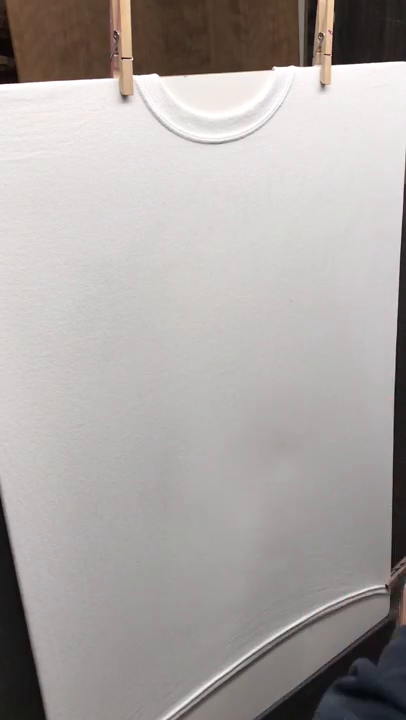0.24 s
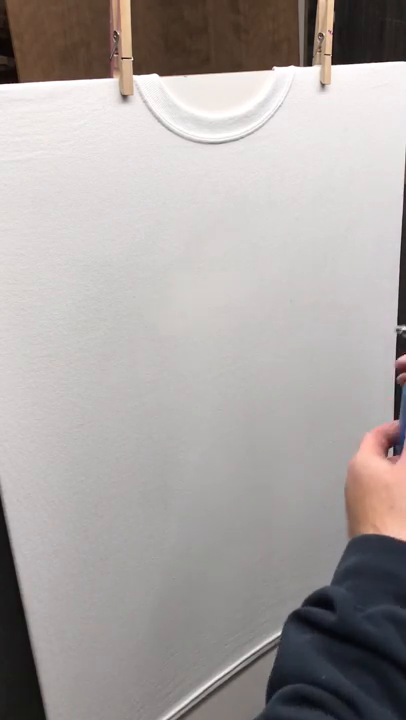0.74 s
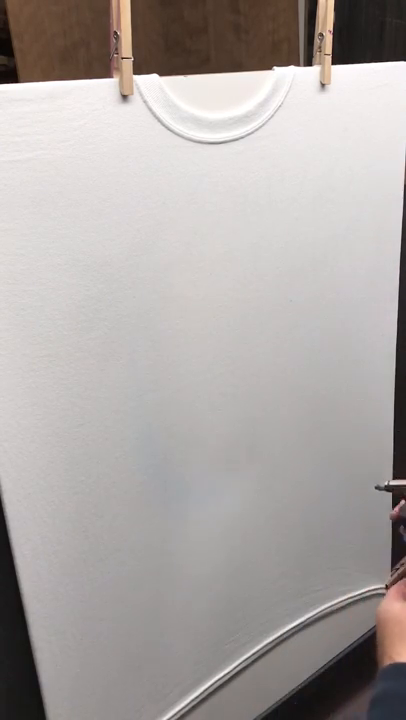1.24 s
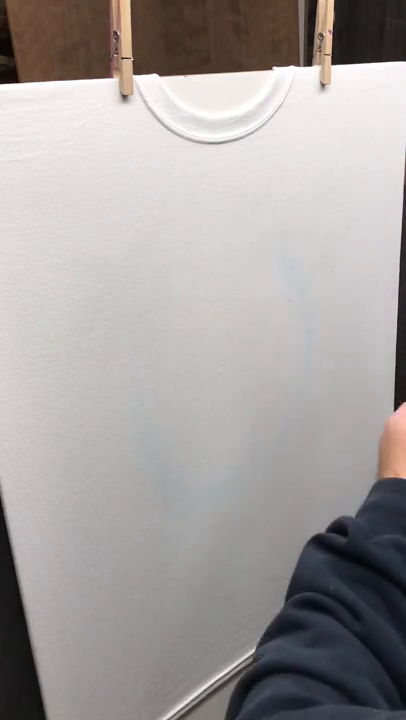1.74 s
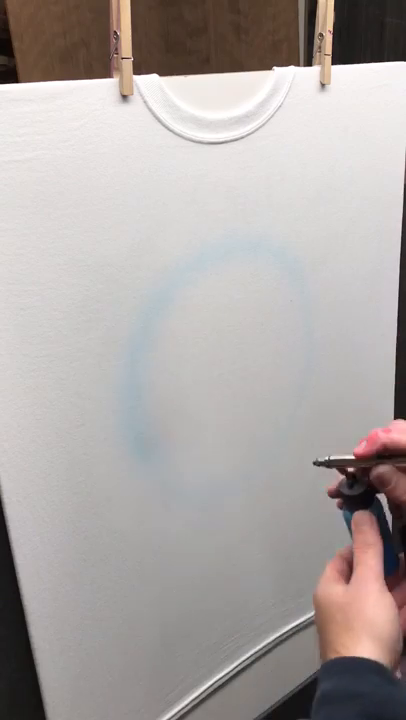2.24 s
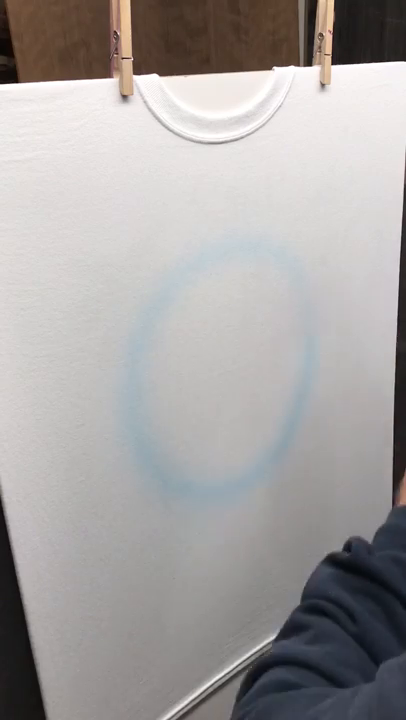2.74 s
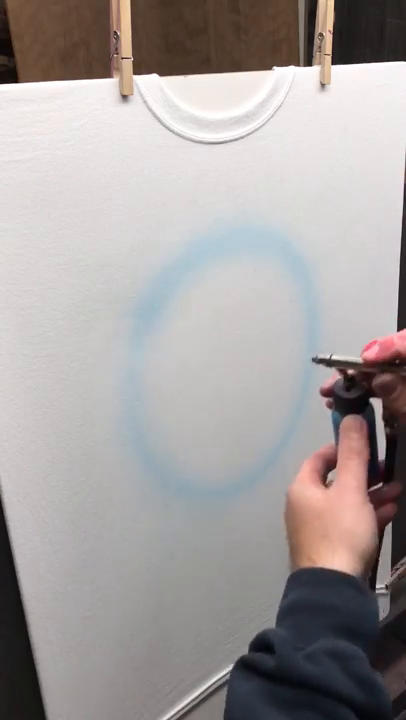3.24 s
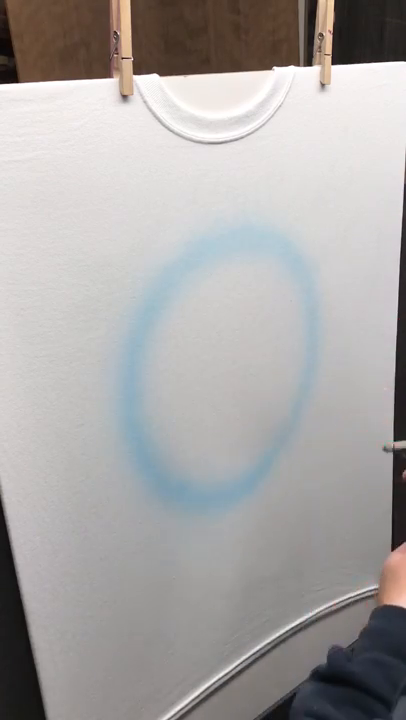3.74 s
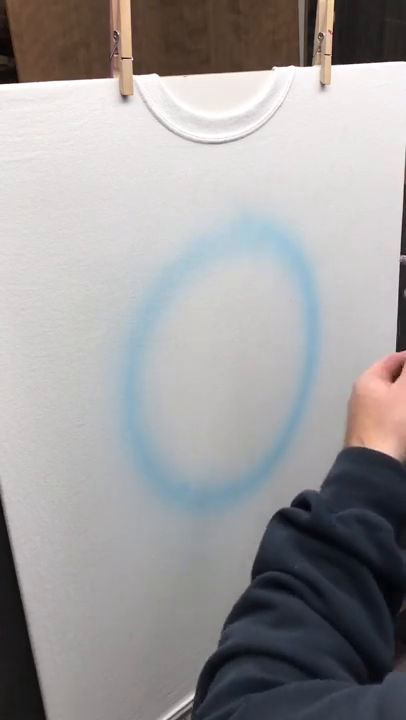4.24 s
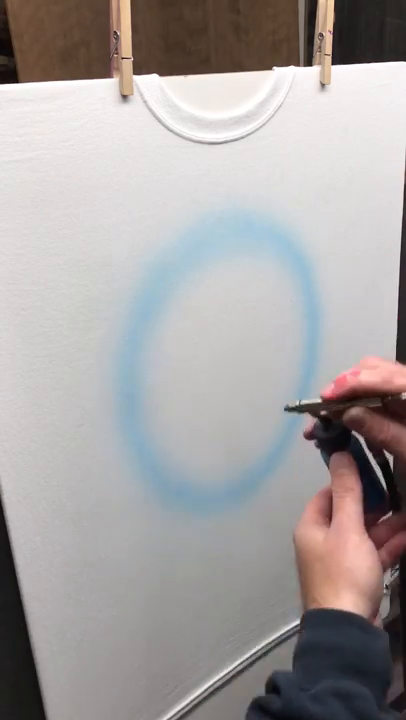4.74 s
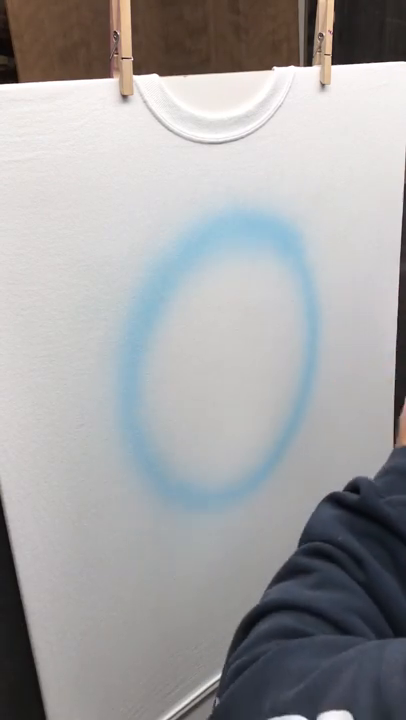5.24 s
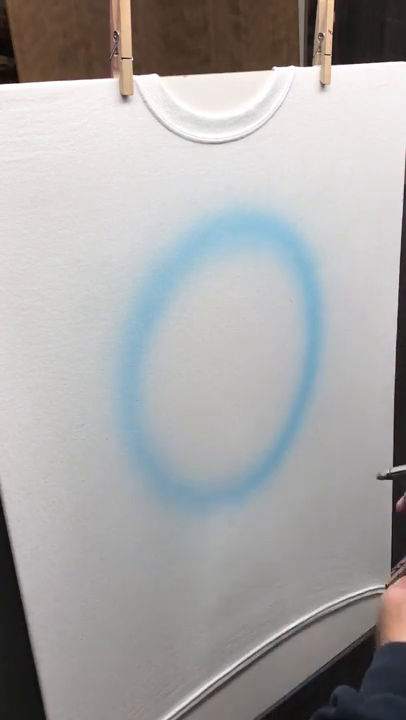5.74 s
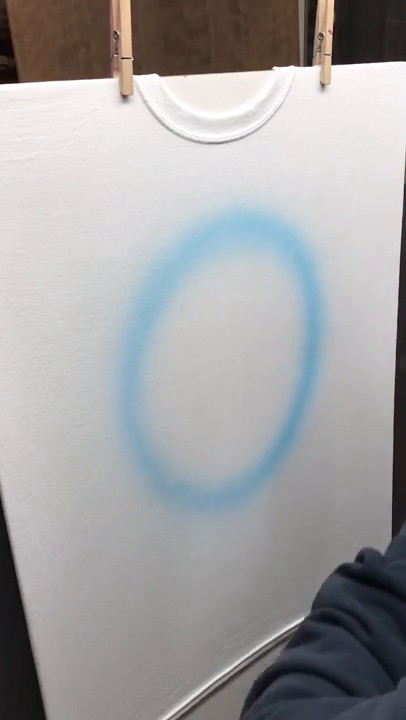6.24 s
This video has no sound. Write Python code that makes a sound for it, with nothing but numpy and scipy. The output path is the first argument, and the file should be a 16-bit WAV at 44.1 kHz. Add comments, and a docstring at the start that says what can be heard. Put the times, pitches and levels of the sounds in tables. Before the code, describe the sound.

Steady high spray hiss rises and falls in slow, uneven waves, its airy tone gliding as a small paint jet circles over fabric indoors.

```python
"""An airbrush hisses as it paints loops on a shirt pinned to a board, in a quiet room.
The nozzle's hiss is shaped noise, louder on each upswing; where the jet strikes the cloth
it adds a softer, lower rush of noise. Short echoes from nearby surfaces comb both sounds,
and the notches glide as the hand circles. Dull puffs, a faint murmur and a hum lie beneath."""
import sys
import numpy as np
from scipy import signal
from scipy.fft import rfft, irfft, next_fast_len
from scipy.io import wavfile
from scipy.ndimage import map_coordinates

SR = 44100
rng = np.random.default_rng(int(sys.argv[2]) if len(sys.argv) > 2 else 0)


def to_wav(s):
    """Save 16-bit WAV."""
    ch = np.atleast_2d(s).T  # columns
    pcm = np.round(np.clip(ch, -1, 1) * 32767)  # PCM
    wavfile.write(sys.argv[1], SR, pcm.astype(np.int16))


N = 285768


def amp(db):
    """Decibels to gain."""
    return 10 ** (np.asarray(db) / 20)


def unit(x):
    """Scale to an rms (average strength) of 1."""
    return x / np.sqrt(np.mean(x ** 2) + 1e-20)


def along(points, hz):
    """Read (frequency, value) points on a logarithmic frequency axis."""
    point_hz, values = np.transpose(points)
    return np.interp(np.log(hz + 1), np.log(point_hz + 1), values)


def curve(points, t):
    """Read (time, value) points at the times t, with straight lines between them."""
    point_s, values = np.transpose(points)
    return np.interp(t, point_s, values)


def wobble(rate):
    """A smooth random curve through `rate` random points a second."""
    points = rng.standard_normal(int(N * rate / SR) + 4)
    return map_coordinates(points, [np.arange(N) * rate / SR])


def filtered(x, response):
    """Filter x with a fixed gain for each frequency: response(Hz)."""
    size = next_fast_len(N + SR // 2)
    spectrum = rfft(x, size) * response(np.fft.rfftfreq(size, 1 / SR))
    return irfft(spectrum, size)[..., :N]


def noise(colour):
    """Random noise of rms 1, with its frequencies weighted by the (Hz, dB) points."""
    white = rng.standard_normal(N)
    return unit(filtered(white, lambda hz: amp(along(colour, hz))))


def swept(x, response):
    """Filter x in short overlapping frames, so the filter can change: response(Hz, s)."""
    frame = 1024  # samples
    hz, t, frames = signal.stft(x, SR, nperseg=frame)
    return signal.istft(frames * response(hz[:, None], t), SR, nperseg=frame)[1][:N]


def delayed(hz, lag_ms):
    """A delay, written as the turn in phase that it gives each frequency."""
    return np.exp(-2j * np.pi * hz * lag_ms / 10 ** 3)


def room(t, drift_db=1.2, hum_hz=176, hum_db=-80):
    """Faint low murmur of noise that drifts in level, with a wavering sine hum in it."""
    # murmur level before the drift: start_s, level_db
    murmur_level = [(0.0, -67.5), (0.35, -70), (1.0, -71), (3.5, -70), (4.55, -68.5), (5.4, -72.5),
                    (6.0, -69), (6.48, -73.5)]
    # colour of the murmur: frequency_hz, density_db (per Hz)
    murmur_colour = [(20, -40), (33, -15), (46, -4), (75, 0.5), (130, 0), (175, -1), (230, -0.5),
                     (400, -3.5), (1000, -16), (4000, -45)]
    level_db = curve(murmur_level, t) + drift_db * wobble(6)
    murmur = amp(level_db) * noise(murmur_colour)
    hum_level = amp(hum_db + 2 * wobble(3.95))
    hum = hum_level * np.sin(2 * np.pi * hum_hz * t + wobble(16))
    return murmur + hum


def bumps(t, rise=0.02, gain_db=-9):
    """Soft low puffs as the brush is swung: noise that swells over `rise` seconds and then dies away."""
    # the puffs: peak_s, level_db (before gain_db)
    puffs = [(0.108, -66), (0.249, -64), (1.218, -58), (2.969, -58), (3.324, -46), (4.578, -65)]
    # colour of the puffs: frequency_hz, density_db (per Hz)
    puff_colour = [(40, -30), (110, -16), (180, -1), (300, -2.5), (450, -2), (1200, -43)]
    envelope = np.zeros(N)
    for peak_s, level_db in puffs:
        age = np.maximum(t - peak_s + rise, 0) / rise  # 1 at the peak
        envelope += amp(level_db + gain_db) * age * np.exp(1 - age)
    return envelope * noise(puff_colour)


def height(t):
    """Height of the hand in its loop; it eases from one turning point to the next."""
    # turning points of the circling hand: time_s, height (0 bottom to 1 top)
    swing = [(0.0, 0.36), (0.2, 0.07), (1.0, 0.68), (1.42, 0.15), (1.92, 0.76), (2.6, 0.19), (3.17, 0.95),
             (3.76, 0.11), (4.47, 0.98), (4.77, 0.24), (5.15, 0.99), (6.14, 0.18), (6.48, 0.77)]
    turn_s, turn_height = np.transpose(swing)
    turns = np.arange(len(turn_s))
    leg, part = np.divmod(np.interp(t, turn_s, turns), 1)
    eased = (1 - np.cos(np.pi * part)) / 2
    return np.interp(leg + eased, turns, turn_height)


def surroundings(hz, t, count=20):
    """Weak later reflections, whose delays shift with the hand and add a fine ripple."""
    strength = 0.055
    earliest_ms, latest_ms, travel_ms = 1.8, 12, 0.33
    hand_ms = travel_ms * height(t)
    reflections = 0
    for u, v in rng.random((count, 2)):
        # squaring crowds the delays early; each may grow or shrink as the hand rises
        lag_ms = earliest_ms + (latest_ms - earliest_ms) * u ** 2 + (2 * v - 1) * hand_ms
        reflections = reflections + delayed(hz, lag_ms)
    return 1 + strength * reflections


def echoes(hz, t):
    """Direct sound plus short echoes; small surfaces reflect little bass and scatter the top."""
    # echoes from nearby surfaces: strength (before the filter below),
    # bottom_lag_ms and top_lag_ms (at the bottom and top of the loop)
    nearby = [(.28, .2, .385), (.24, .195, .09), (.18, .486, .87), (.11, .53, .39), (.08, 2.6, 2.93)]
    lowest_hz, dull_hz = 1300, 11000
    bounces = 0
    for strength, bottom_ms, top_ms in nearby:
        lag_ms = bottom_ms + (top_ms - bottom_ms) * height(t)
        bounces = bounces + strength * delayed(hz, lag_ms)
    bass_cut = hz ** 2 / (hz ** 2 + lowest_hz ** 2)
    treble_cut = 1 / (1 + (hz / dull_hz) ** 2)
    return 1 + bounces * bass_cut * treble_cut


def stroke(t):
    """Rush and body (dB) of the jet on the cloth: each stroke rises, holds and falls back."""
    # strokes in which the jet bears on the cloth: start_s, end_s (middles of the rise and fall),
    # rush_db (level before swing and gain), body_db (lift of the lower rush)
    strokes = [(0.95, 1.46, -55, -9), (1.87, 4.62, -52, 0.5), (4.957, 5.884, -52.5, 0.5),
               (6.245, 6.6, -52, 1.5)]
    attack_s, release_s = 0.17, 0.04
    glancing_db = -66.5  # rush between strokes

    def ramp(age, length):
        return np.clip(0.5 + age / length, 0, 1)

    rush_db, body_db = glancing_db, 0
    for start, end, stroke_rush_db, stroke_body_db in strokes:
        contact = ramp(t - start, attack_s) * ramp(end - t, release_s)
        rush_db = rush_db + (stroke_rush_db - glancing_db) * contact
        body_db = body_db + stroke_body_db * contact
    return rush_db, body_db


def cloth(t, flutter_db=0.8, swing_db=4.5, gain_db=-1.0):
    """The jet spreads over the shirt: a rush, louder at the top of the loop, hollower at the bottom."""
    # colour of the rush: frequency_hz, density_db (per Hz)
    rush_colour = [(100, -35), (250, -15.5), (430, -16.5), (540, -1.5), (850, -1), (1100, 1), (1450, -3),
                   (1700, -2), (2400, -5), (4000, -2.5), (9000, -25)]
    # the shirt's deep, then hollow resonance: centre_hz, width_hz, usual_db (usual share)
    resonances = [(530, 200, -7.5), (1086, 180, -5)]
    # changing share of the deep resonance: time_s, share_db
    deep_share = [(0.9, -6), (1.2, -6), (2.0, -17), (2.5, -12), (3.0, -20), (3.2, -4), (3.65, -2),
                  (4.05, -16.5), (4.4, -8.5), (5.1, -12), (5.45, -7), (6.35, -16)]
    # the hollow share: at the bottom, its fall towards the top, its growth per dB of rush
    hollow_db, hollow_fall_db, hollow_grows = 1, 12, 0.38

    def colour(hz, s):
        rush_db, body_db = stroke(s)
        deep_db = curve(deep_share, s)
        hollow_share_db = (hollow_db - hollow_fall_db * height(s)
                           + hollow_grows * (rush_db - rush_db.max()))
        resonance_db = 0
        for (centre, width, usual), share in zip(resonances, (deep_db, hollow_share_db)):
            peak = 1 / (1 + (2 * (hz - centre) / width) ** 2)
            resonance_db = resonance_db + (share - usual) * peak
        low_weight = along([(1200, 0.95), (1650, 0)], hz)
        return amp(resonance_db + body_db * low_weight)

    level_db = stroke(t)[0] + swing_db * height(t) + gain_db + flutter_db * wobble(25)
    return amp(level_db) * unit(swept(noise(rush_colour), colour))


def nozzle(t, flutter_db=0.45, sputter_db=0.5, treble_db=0.6, turn_db=1.5, wrist_lead_s=0.29, gain_db=4.0):
    """Turbulent hiss of the jet; it mellows as the wrist points it away ahead of each downswing."""
    # hiss level, higher on each upswing: time_s, level_db (before gain_db and trembling)
    hiss_level = [(0.0, -38), (0.22, -43.5), (0.47, -45.5), (0.99, -35), (1.12, -34), (1.43, -41.5),
                  (1.64, -41.5), (1.97, -31), (2.31, -32.5), (2.49, -38), (2.71, -39.5), (3.21, -31),
                  (3.48, -32), (3.72, -39), (4.1, -38), (4.39, -31.5), (4.6, -31), (4.76, -41.5),
                  (4.85, -38.5), (4.96, -30.5), (5.2, -32), (5.31, -34.5), (6.17, -43.5), (6.21, -40.5),
                  (6.48, -36.5)]
    # colour of the hiss: frequency_hz, density_db (per Hz)
    hiss_colour = [(300, -54), (1200, -23.5), (2300, -15.5), (2900, -7), (3900, -9.5), (4700, -5),
                   (6030, -7), (6160, -12.5), (7200, -7.5), (9200, -4), (10100, -5), (11600, -1.4),
                   (14000, -0.9), (15500, .5)]

    def colour(hz, s):
        # the change is weak below 5500 Hz and strongest from 11000 Hz up
        treble_weight = along([(5500, 0.12), (11000, 0.63)], hz)
        return amp((treble_db - turn_db * height(s + wrist_lead_s)) * treble_weight)

    # paint leaves the needle unevenly, so the hiss trembles a little
    trembling_db = flutter_db * wobble(35) + sputter_db * wobble(400)
    level_db = curve(hiss_level, t) + gain_db + trembling_db
    return amp(level_db) * swept(noise(hiss_colour), colour)


def scene():
    """Hiss and rush with their reflections, over the puffs and the room; both channels alike."""
    t = np.arange(N) / SR
    jet = nozzle(t) + cloth(t)
    spray = swept(jet, lambda hz, s: echoes(hz, s) * surroundings(hz, s))
    return np.tile(spray + bumps(t) + room(t), (2, 1))


def record(dry):
    """The microphone keeps nothing above its band limit."""
    top_hz = 15800
    return filtered(dry, lambda hz: hz < top_hz)


dry = scene()
out = record(dry)
to_wav(out)
```